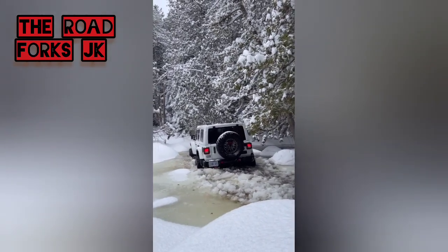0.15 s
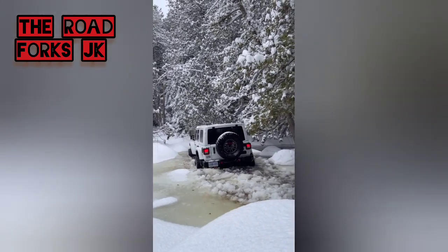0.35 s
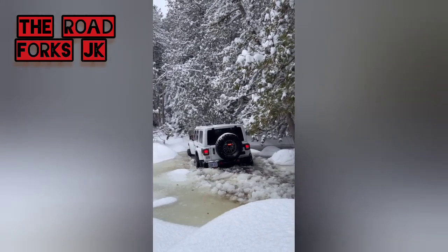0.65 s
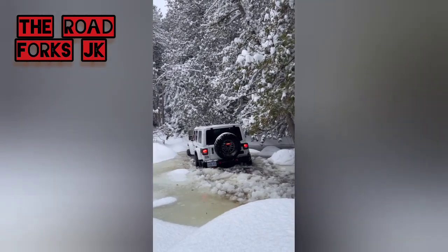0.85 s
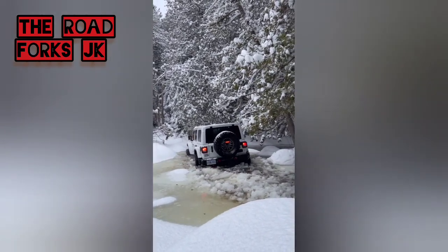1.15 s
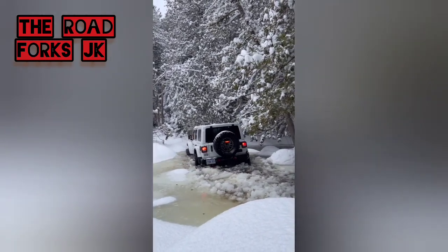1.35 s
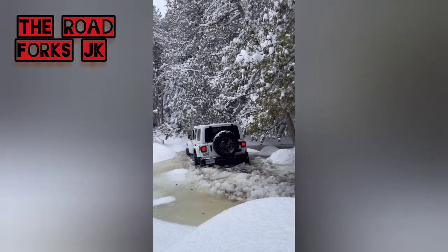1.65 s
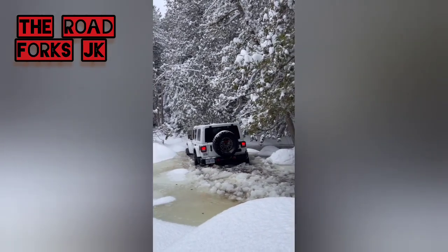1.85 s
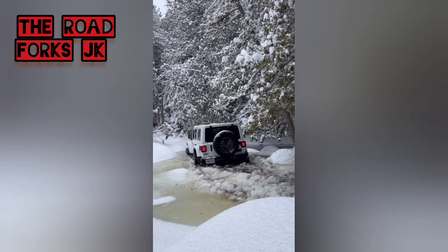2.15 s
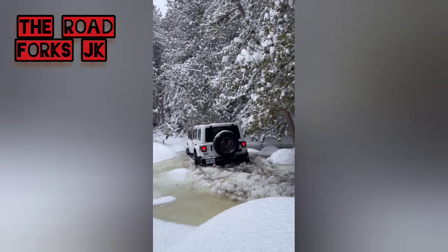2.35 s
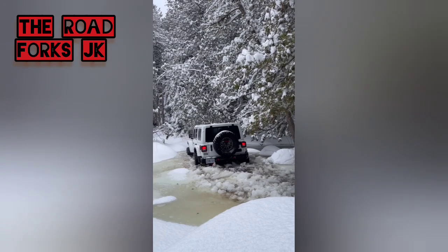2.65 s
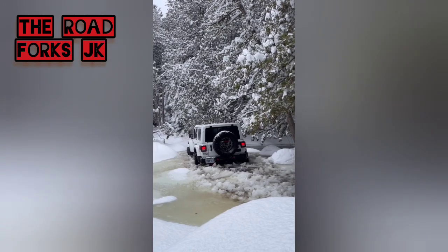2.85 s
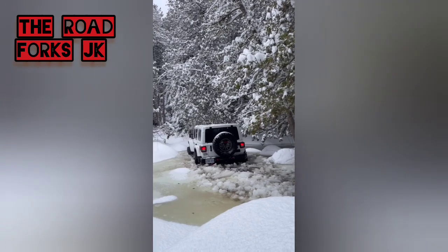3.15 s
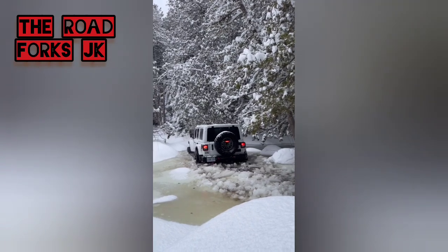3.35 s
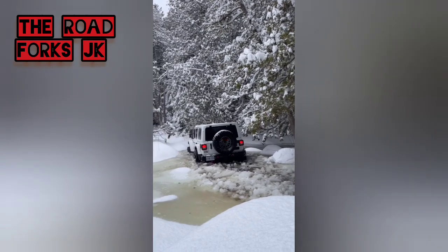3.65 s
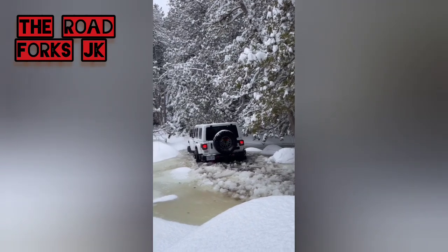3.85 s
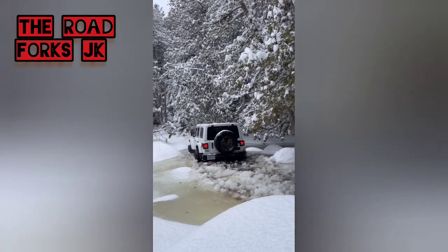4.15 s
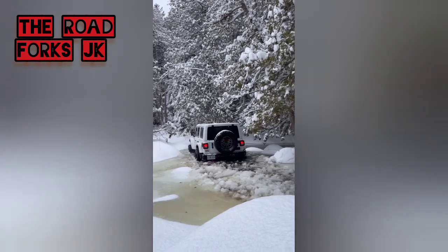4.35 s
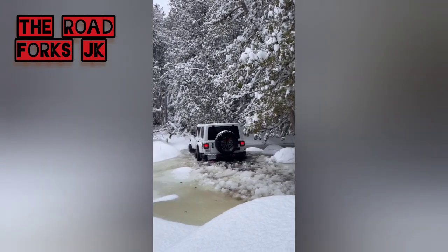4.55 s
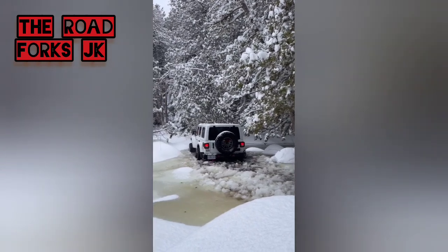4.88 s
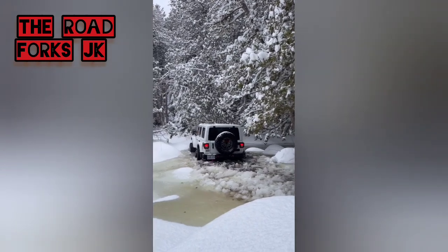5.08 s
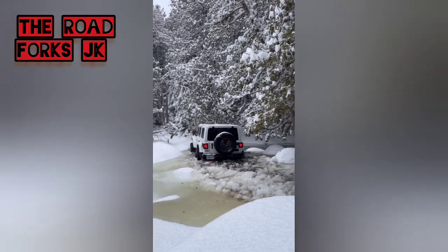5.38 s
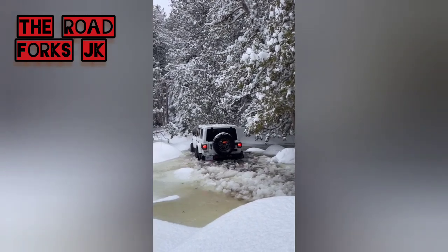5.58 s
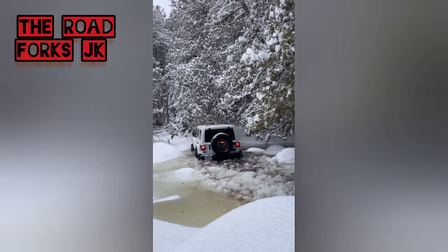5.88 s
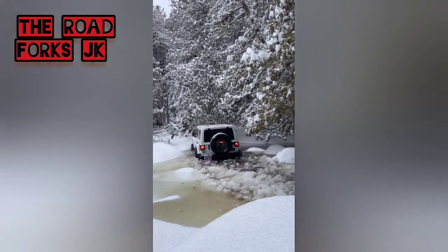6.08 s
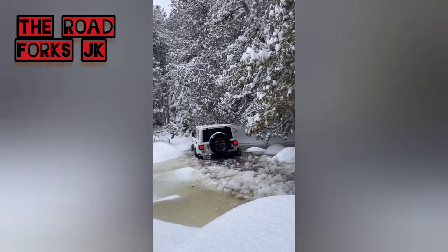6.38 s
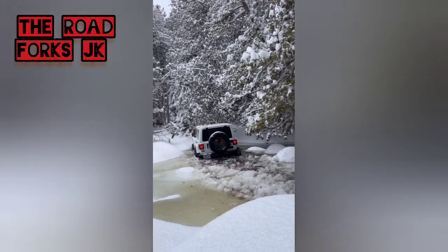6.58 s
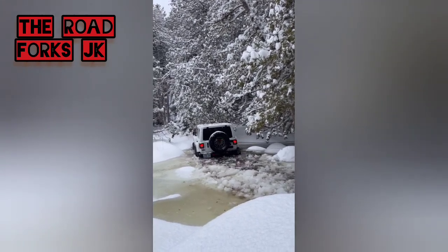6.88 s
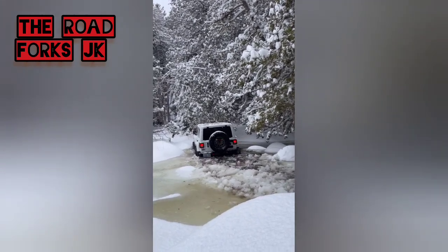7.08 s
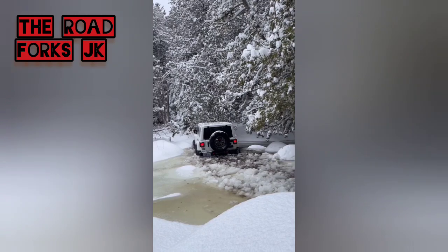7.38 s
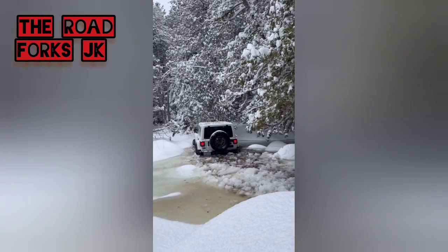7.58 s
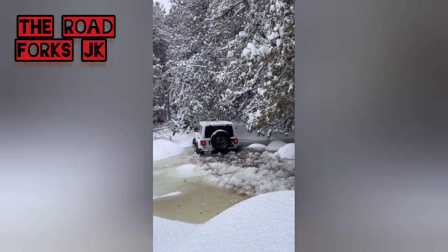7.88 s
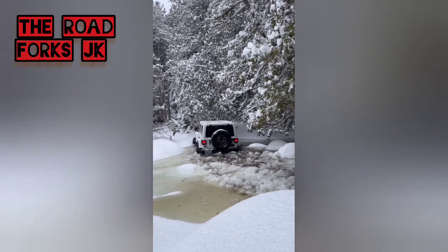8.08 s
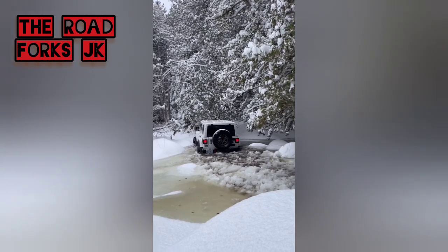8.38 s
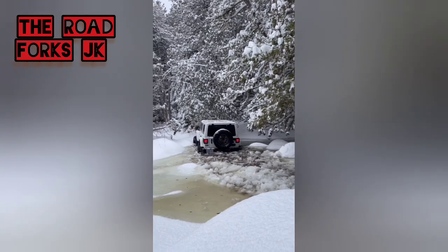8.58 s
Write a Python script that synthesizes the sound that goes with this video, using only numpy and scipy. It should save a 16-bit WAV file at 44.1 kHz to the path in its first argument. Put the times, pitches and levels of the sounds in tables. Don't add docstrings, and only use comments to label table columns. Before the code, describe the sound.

Low engine revs rise and fall outdoors over wet slush wash, with ice clunks, scrapes and cracks, then a rough, spitting, shuddering final stretch.

```python
import sys
import numpy as np
from scipy import signal
from scipy.fft import rfft, irfft, next_fast_len
from scipy.io import wavfile

SR = 44100
rng = np.random.default_rng(int(sys.argv[2]) if len(sys.argv) > 2 else 0)


def volts_from_decibels(level):
    exponent = np.asarray(level, float) / 20
    return 10 ** exponent


def file_out(sig):
    cols = np.atleast_2d(sig).T
    lim = np.clip(cols, -1, 1)
    pcm = np.round(lim * 32767).astype(np.int16)
    wavfile.write(sys.argv[1], SR, pcm)


N = 384993
TIME = np.arange(N) / SR
STEP = 20
SLOW_TIME = np.arange(0, N, STEP) / SR


def rms_one(x):
    return x / np.sqrt(np.mean(x ** 2) + 1e-20)


def held(slow):
    return np.repeat(slow, STEP)[:N]


def in_time(rows):
    s, *columns = np.transpose(rows)
    return [np.interp(TIME, s, c) for c in columns]


def at_hz(points, hz):
    at, value = np.transpose(points)
    return np.interp(np.log(hz), np.log(at), value)


def eased(rows, t):
    s, v = np.transpose(rows)
    slope = np.diff(v) / np.diff(s)
    a, b = np.r_[slope[0], slope], np.r_[slope, 0]
    tangent = np.where(a * b > 0, 2 * a * b / (a + b + 1e-12), 0)
    k = np.clip(np.searchsorted(s, t) - 1, 0, len(s) - 2)
    h = s[k + 1] - s[k]
    u = np.clip((t - s[k]) / h, 0, 1)
    path = v[k] + (v[k + 1] - v[k]) * u * u * (3 - 2 * u)
    return path + h * u * (1 - u) * ((1 - u) * tangent[k] - u * tangent[k + 1])


def bumps(rows, width_s):
    return held(sum(height * np.exp(-((SLOW_TIME - s) / width_s) ** 2) for s, height in rows))


def drift(rate):
    r = np.exp(-80 * np.pi * rate / SR)
    white = rng.standard_normal(N // 40 + 2002)
    slow = signal.lfilter([1], [1, -2 * r, r * r], white)[2000:]
    return np.interp(np.arange(N) / 40, np.arange(len(slow)), rms_one(slow))


def ring(clicks, hz, t60):
    r, w = volts_from_decibels(-60 / (t60 * SR)), 2 * np.pi * hz / SR
    return signal.lfilter([0, np.sin(w)], [1, -2 * r * np.cos(w), r * r], clicks + 1e-18)


def banded_noise(spectrum, low_hz, count, shared_db, own_db):
    out, together, white = 0, drift(7.0), rng.standard_normal((2, N))
    for k in range(count):
        low = low_hz * 2 ** (k / 2)
        sos = signal.butter(2, [low, low * np.sqrt(2)], "band", fs=SR, output="sos")
        band = signal.sosfilt(sos, white[k % 2])
        level_db = at_hz(spectrum, low * 2 ** (1 / 4)) + shared_db * together + own_db * drift(24.0)
        out = out + band * volts_from_decibels(level_db)
    return rms_one(out)


# frequency in Hz, width in Hz, level in dB.
PIPE_RESONANCES = [(57.57, 6.6, 8.5), (124.7, 18, -10.5), (166.2, 16.4, -14.5), (224.3, 28, -18.5)]


def pipe(hz):
    return sum(volts_from_decibels(db) / (1j + (hz / at - at / hz) * -at / width) for at, width, db in PIPE_RESONANCES)


def driveline_lurch():
    start_s, rise_s, fall_s = 7.02, 0.41, 0.84
    swing_hz, crest_s, depth = 7.33, 7.665, 0.57
    wound = (SLOW_TIME - start_s) / rise_s
    dying = np.exp(-(np.maximum(wound - 1, 0) * rise_s / fall_s) ** 2)
    swing = depth * np.clip(wound, 0, 1) * dying
    return abs(1 + swing * np.exp(2j * np.pi * swing_hz * (SLOW_TIME - crest_s)))


# frequency in Hz, level in dB.
BOOM = [(48, -20), (60, -16), (80, -31.5), (88, -28.5), (107, -35.5), (128, -23.5), (150, -29.5),
        (172, -21)]
# frequency in Hz, share of the opening felt.
CHOKE = [(60, 1.23), (90, 0.68), (128, 1.38), (150, 0.93), (172, .05)]
# level in dB, share of the throttle felt.
STRONG_ORDERS = [(1, 0.05), (0.5, 0.1), (-9.5, 0.43)]


def strong_orders(speed, crank, open_db, throttle_db, lurch):
    out = 0
    for k, (order_db, pushed) in zip((2, 3, 4), STRONG_ORDERS):
        hz = k * speed
        level_db = order_db + at_hz(BOOM, hz) + at_hz(CHOKE, hz) * open_db + pushed * throttle_db
        out = out + np.sqrt(2) * volts_from_decibels(level_db) * lurch * np.cos(k * crank + np.angle(pipe(hz)))
    return out


# multiple of crank speed, level in dB.
WEAK_ORDERS = [(1, -8), (1.5, -17.5), (2.5, -12), (3.5, -7.5), (4.5, -10), (5, 3), (5.5, -9), (6, 5.5),
               (6.5, -23.5), (7, 4), (8, 4.5), (9, 1.5), (10, -5), (11, 5), (12, 25)]
# time in seconds, jitter in radians of crank.
ROUGHNESS = [
    (0, .025),
    (5.3, .03),
    (5.8, .1),
    (6.4, .04),
    (7.0, .08),
    (8.2, .15),
    (8.5, .04),
]


def weak_orders(speed, crank, throttle_db, lurch):
    muffler_hz = 241.7
    weights = [volts_from_decibels(db) * pipe(k * speed) / (1 + (k * speed / muffler_hz) ** 13.0) for k, db in WEAK_ORDERS]
    upper = np.sqrt(sum(abs(w) ** 2 for w, (k, _) in zip(weights, WEAK_ORDERS) if k > 4))
    jitter = in_time(ROUGHNESS)[0][::STEP]
    out = 0
    for w, (k, _) in zip(weights, WEAK_ORDERS):
        uneven_db = 2.0 * drift(6.0)[::STEP]
        late = k * drift(12.0)[::STEP] * jitter
        wave = np.real(w / upper * np.exp(1j * (k * crank + late)))
        out = out + volts_from_decibels(throttle_db - 36.0 + uneven_db) * lurch ** 0.81 * wave
    return out


# frequency in Hz, width in Hz, level in dB.
RASP = [(164, 60, -3.5), (330.6, 68, 1), (471, 41, -7), (572, 5.9, -12.5)]


def exhaust_rasp(speed, crank, open_db, throttle_db):
    gas = rng.standard_normal(N) * held(volts_from_decibels(1.3 * np.cos(crank - 1.5)))
    crank_at_edges = np.interp(np.arange(N + 1) / SR, SLOW_TIME, crank)
    fired = np.diff(np.floor(crank_at_edges / (2 * np.pi)))
    gas = gas + 28.0 * fired * held(volts_from_decibels(0.5 * (speed - 30) + 2.5 * drift(15.0)[::STEP]))
    revving = held(speed - 30)
    rasp = 0
    for hz, width, db in RASP:
        level_db = db + 0.29 * revving * np.log2(hz / 330)
        rasp = rasp + volts_from_decibels(level_db) * rms_one(ring(gas, hz, 3.0 / width))
    return rasp * held(volts_from_decibels(0.34 * throttle_db + 0.14 * (speed - 30.5) + 0.15 * open_db - 51.5))


# time in seconds, speed in turns per second.
CRANK_SPEED = [(0, 30), (0.35, 32.1), (0.7, 28.7), (0.95, 29.1), (1.5, 25.2), (1.9, 24.6), (2.3, 35),
               (2.76, 43.6), (3.7, 25.2), (4.05, 26.1), (4.42, 31.3), (5.2, 26.4), (5.7, 28.6),
               (6.65, 29.0), (7.12, 26.5), (7.62, 30.6), (8.13, 32.6), (8.72, 44.5)]
# time in seconds, openness of the half-flooded tailpipe in dB, throttle in dB.
DRIVING = [(0.05, 0.5, 6), (1.1, -1, 2), (1.5, -6, 2), (1.9, -6.5, -0.5), (2.2, -0.5, 2.5), (2.77, 3, 4),
           (3.33, -3.5, 3), (4.0, -8.5, 0.5), (4.3, -2, 3), (4.9, -3, 5.5), (5.16, -5.5, -1),
           (5.6, -3, 4.5), (5.95, -6.5, 3.5), (6.28, -8.5, 1.5), (6.7, -3, 4.5), (7.4, -12, -1),
           (8.3, -6.5, -2), (8.7, -11, 1.5)]


def engine():
    speed = eased(CRANK_SPEED, SLOW_TIME)
    crank = 2 * np.pi * np.cumsum(speed) * STEP / SR
    open_db, throttle_db = (c[::STEP] for c in in_time(DRIVING))
    lurch = driveline_lurch()
    orders = strong_orders(speed, crank, open_db, throttle_db, lurch)
    orders = orders + weak_orders(speed, crank, throttle_db, lurch)
    rasp = exhaust_rasp(speed, crank, open_db, throttle_db)
    return signal.resample_poly(orders, STEP, 1)[:N] + rasp, np.interp(TIME, SLOW_TIME, crank)


# frequency in Hz, level in dB per Hz.
WASH = [(150, 15.5), (300, -1), (450, -4), (600, -2.5), (900, -5.5), (1400, -7.5), (2000, -8), (2800, -15),
        (4000, -43)]


def lumps(per_s):
    sizes = volts_from_decibels(3.16 * np.minimum(rng.exponential(1, N), 4)) * rng.choice([-1, 1], N)
    born = rng.random(N) < per_s * volts_from_decibels(5.0 * drift(8.0)) / SR
    dealt = rng.integers(0, 16, N)
    out = 0
    for k, hz in enumerate(np.geomspace(450, 3200, 16)):
        out = out + volts_from_decibels(at_hz(WASH, hz)) * ring(sizes * born * (dealt == k), hz, 24.0 / hz)
    return rms_one(out)


# time in seconds, depth in dB.
SPUTTER = [
    (0.3, 3),
    (1.4, 5),
    (2.6, 2),
    (5.5, 3),
    (5.7, 10),
    (6.45, 12),
    (6.6, 8),
    (7.3, 10),
    (7.9, 5),
]


def tailpipe_spit(crank):
    one_spit_s = 6.128
    turns = (crank - crank[round(one_spit_s * SR)]) / (2 * np.pi)
    strength = rng.random(400)[np.floor(turns).astype(int) % 400] ** 0.4
    pulse = np.sin(np.pi * (turns % 1) ** 0.45) ** 2
    return volts_from_decibels(in_time(SPUTTER)[0] * (strength * pulse - 0.4)), turns


# frequency in Hz, level in dB, t60 in seconds.
DROPS = [
    (1180, -11, 0.11),
    (1950, -1.5, 0.037),
    (3084, -2, 0.04),
]


def drop_rattle(spit, turns):
    start = (turns % 1 < 0.25) * np.clip(spit - 1, 0, 1.2)
    return sum(volts_from_decibels(db) * ring(start * rng.standard_normal(N), hz, t60) for hz, db, t60 in DROPS)


# time in seconds, level in dB.
PANEL_HUMS = [(0.68, -33), (0.95, -44), (2.5, -45), (3.47, -53), (5.76, -38), (6.03, -31), (6.44, -38.5),
              (6.85, -54), (7.07, -48), (7.33, -42), (7.46, -41), (7.6, -41), (7.73, -40), (7.86, -43),
              (8.14, -60)]


def body_panel(wash_db):
    hz, width_hz, swell_s = 654, 29, 0.059
    hum = volts_from_decibels(wash_db + 0.5) + bumps([(s, volts_from_decibels(db)) for s, db in PANEL_HUMS], swell_s)
    return hum * rms_one(ring(rng.standard_normal(N), hz, 1.43 / width_hz))


# time in seconds, wash level in dB.
CHURN = [(0.05, -58), (0.3, -55.5), (0.68, -49.5), (1.15, -50), (1.4, -55.5), (1.92, -60.5), (2.43, -56),
         (3.18, -43.5), (3.5, -43.5), (4.01, -52), (4.52, -55), (5.35, -55), (5.7, -49.5), (6.17, -48.5),
         (6.6, -54.5), (7.1, -52.5), (7.6, -54), (8.73, -53.5)]
# time in seconds, rise of the wash in dB.
SLAPS = [
    (6.17, 0.5),
    (6.76, 7),
    (7.85, 3.5),
    (8.44, 3.5),
]
# frequency in Hz, level in dB.
SPRAY = [(2500, -7), (3300, -6.5), (4700, 4.5), (6500, -9.5), (9000, 0), (13000, -2)]


def slush(crank):
    wash_db = in_time(CHURN)[0] + bumps(SLAPS, 0.03)
    spray_db = -62.5 + 1.06 * (wash_db + 51.5) - 0.35 * TIME
    spit, turns = tailpipe_spit(crank)
    wash = banded_noise(WASH, 204.0, count=9, shared_db=0.74, own_db=2.5) + volts_from_decibels(-6) * lumps(300.0)
    wash = spit * wash + volts_from_decibels(-20.5) * drop_rattle(spit, turns)
    spray = banded_noise(SPRAY, 2122, count=5, shared_db=1.0, own_db=2.0) * volts_from_decibels(1.1 * drift(50.0))
    spray = spit ** 0.6 * spray
    return volts_from_decibels(wash_db + 3.5) * wash + volts_from_decibels(spray_db + 7.0) * spray + volts_from_decibels(-11.0) * body_panel(wash_db)


# start in seconds, peak in dB, pitch in Hz, t60 in seconds.
KNOCKS = [(0.552, -39, 536, 0.11), (0.655, -31.5, 750, 0.046), (0.702, -29.5, 675, 0.025),
          (0.719, -30, 630, 0.036), (0.798, -33, 635, 0.11), (2.736, -27.5, 577, 0.071),
          (2.985, -27, 580, 0.03), (3.013, -29.5, 513, 0.043), (3.154, -31, 595, 0.056),
          (3.307, -50, 554, 0.045), (3.46, -31, 600, 0.094), (3.5, -34.5, 813, 0.059),
          (3.794, -25.5, 564, 0.034), (3.951, -49, 497, 0.04), (5.518, -37, 840, 0.073),
          (5.746, -35, 653, 0.032), (6.043, -37, 660, 0.03), (6.69, -32.5, 500, 0.053),
          (6.753, -36, 630, 0.034), (6.769, -33, 555, 0.029), (7.054, -39, 684, 0.04),
          (7.449, -35.5, 677, 0.049), (7.811, -38, 640, 0.097)]


def knocks():
    out, t = np.zeros(N + SR), np.arange(SR // 5) / SR
    grate = rng.standard_normal((len(KNOCKS), len(t)))
    neighbours = rng.uniform(0.51, 1.44, len(KNOCKS))
    for (s, db, hz, t60), rough, near in zip(KNOCKS, grate, neighbours):
        push = rough * np.minimum(t / 0.001, 1) * np.exp(-t / 0.0086)
        t60 = max(t60, 0.005)
        hit = ring(push, hz, t60) + 0.84 * ring(push, hz * near, t60 * 0.89)
        first = round(s * SR)
        out[first:first + len(t)] += volts_from_decibels(db + 1.5) * hit / np.abs(hit).max()
    return out[:N]


# start in seconds, peak in dB, resonance in Hz.
SCRAPES = [(0.603, -28.5, 1090), (0.641, -41.5, 1035), (0.946, -33.5, 990), (1.098, -34.5, 910),
           (2.7357, -39, 990), (2.979, -36, 1100), (3.072, -32, 1030), (3.1994, -32, 1620),
           (3.235, -27, 1950), (3.641, -33.5, 1460), (5.737, -39, 1010), (5.821, -31, 2100),
           (5.886, -34, 1100), (5.925, -36.5, 1180), (5.989, -27.5, 1800), (6.177, -34, 1166),
           (6.209, -35, 1030), (6.304, -29.5, 1660), (6.409, -33, 1710), (7.054, -42, 982),
           (7.162, -33.5, 1150), (7.276, -25.5, 1680), (7.414, -28, 1150), (7.52, -29, 1950),
           (7.7834, -33.5, 1010), (8.216, -35.5, 1010), (8.3565, -32, 900), (8.4108, -34, 1720),
           (8.537, -30, 1160)]


def scrapes():
    out, t = np.zeros(N + SR), np.arange(SR // 8) / SR
    shape = (len(SCRAPES), len(t))
    grit = rng.standard_normal(shape) * (rng.random(shape) < 0.04)
    grit[:, 0] = 4
    broad = signal.butter(1, [700, 3500], "band", fs=SR, output="sos")
    for (s, db, hz), clicks in zip(SCRAPES, grit):
        clicks = clicks * np.exp(-t / 0.028)
        hit = ring(clicks, hz, 20.6 / hz) + 4.5 * signal.sosfilt(broad, clicks)
        first = round(s * SR)
        out[first:first + len(t)] += volts_from_decibels(db - 1.0) * hit / np.abs(hit).max()
    return out[:N]


# start in seconds, peak in dB, length in seconds.
CRACKS = [(0.297, -45.5, 0.015), (0.499, -42.5, 0.021), (1.209, -42.5, 0.0061), (1.795, -30.5, 0.021),
          (2.696, -41.5, 0.0073), (3.247, -50, 0.0081), (3.377, -46.5, 0.0093), (3.925, -52, 0.0049),
          (4.895, -42.5, 0.011), (5.063, -47, 0.0049), (5.079, -38, 0.011), (5.563, -41.5, 0.03),
          (5.6077, -35, 0.014), (5.68, -38, 0.0048), (5.797, -49.5, 0.0057), (5.903, -43, 0.008),
          (5.915, -42, 0.015), (5.977, -40, 0.011), (6.036, -45, 0.01), (6.146, -44, 0.012),
          (6.693, -50, 0.011), (6.728, -41.5, 0.019), (7.021, -47, 0.011), (7.042, -41, 0.011),
          (7.095, -40, 0.0051), (7.161, -43, 0.018), (7.239, -42, 0.008), (7.544, -45.5, 0.0053),
          (7.7828, -32.5, 0.008), (8.413, -46.5, 0.0068)]


def cracks():
    t, gate = np.arange(SR // 10) / SR, np.zeros(N + SR)
    for s, db, length in CRACKS:
        first = round(s * SR)
        gate[first:first + len(t)] += volts_from_decibels(db - 6.5) * np.exp(-(t / max(length, 0.001)) ** 2)
    bright = signal.butter(1, [1500, 16000], "band", fs=SR, output="sos")
    return gate[:N] * rms_one(signal.sosfilt(bright, rng.standard_normal(N)))


# frequency in Hz, lead of the left in half cycles,
# level in dB of what one port hears alone.
PORTS = [(200, 0, -60), (330, 0, -20), (700, 0, -19), (1150, 0, -30), (1950, 0, -60), (2050, .08, -20),
         (2900, .2, -6), (3300, .6, -6), (3950, .3, -7), (4800, 1, -10), (5150, 1.6, -6), (5650, 1.95, -20),
         (5700, 2, -60), (6300, 2, -60), (6500, 2.2, -8), (8200, 2.75, -9), (8700, 3, -32), (9500, 3, -36),
         (9650, 2.45, -6), (10150, 2.27, -6), (11000, 3, -9), (11600, 3.93, -14), (11750, 4, -60)]
# frequency in Hz, level in dB.
MICROPHONE = [(3000, -1), (4000, 0.5), (4700, -3), (6600, -5.5), (8000, -2), (9600, -1), (10800, 1.5),
              (11600, -2.5), (11900, -14), (12350, -1), (12600, -56), (14000, -42)]


def ports(x):
    size = next_fast_len(N + 4096)
    hz = np.arange(size // 2 + 1) * SR / size
    at, lead, own_db = np.transpose(PORTS)
    turn = np.exp(0.5j * np.pi * np.interp(hz, at, lead))
    colour = volts_from_decibels(at_hz(MICROPHONE, hz + 1))
    above_boom = signal.sosfilt(signal.butter(4, 300, "high", fs=SR, output="sos"), x)
    scattered = above_boom * drift(60.0)
    own = rfft(scattered, size) * volts_from_decibels(np.interp(hz, at, own_db)) * colour
    shared = rfft(x, size) * colour
    left = irfft((shared + own) * turn, size)[:N]
    right = irfft((shared - own) / turn, size)[:N]
    return np.array([left, right])


def scene():
    exhaust, crank = engine()
    return ports(exhaust + slush(crank) + knocks() + scrapes() + cracks())


def roll_off(x):
    return signal.sosfilt(signal.butter(12, 12260, fs=SR, output="sos"), x)


def record(dry):
    return roll_off(dry)


dry = scene()
out = record(dry)
file_out(out)
```